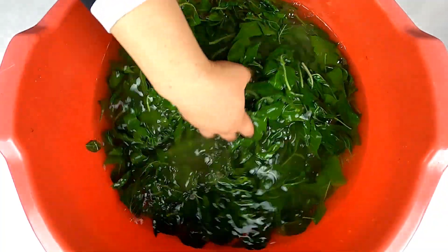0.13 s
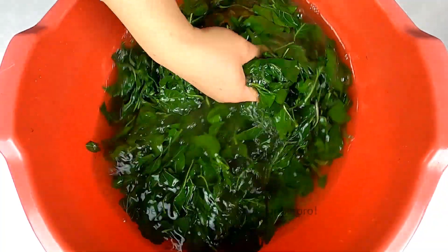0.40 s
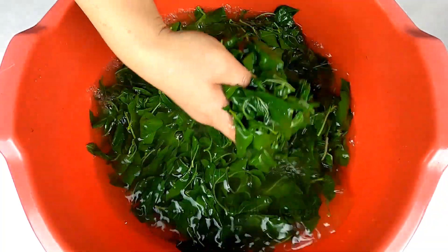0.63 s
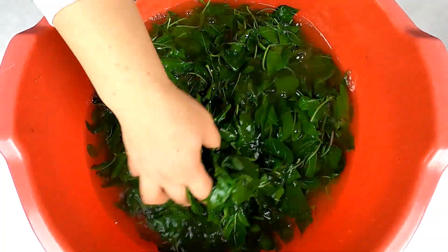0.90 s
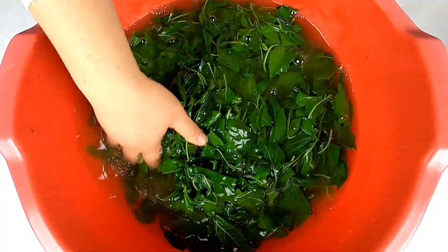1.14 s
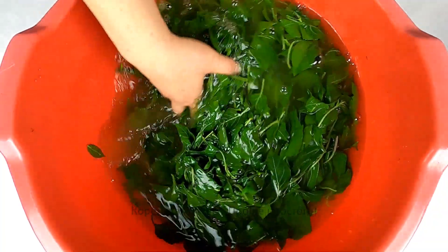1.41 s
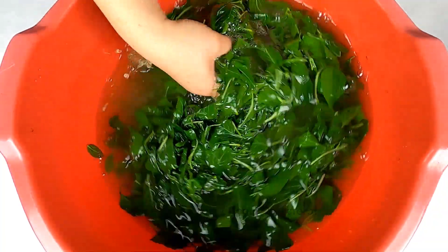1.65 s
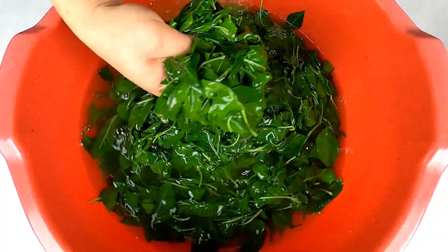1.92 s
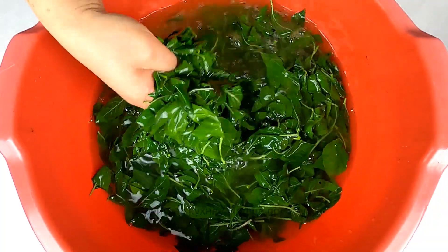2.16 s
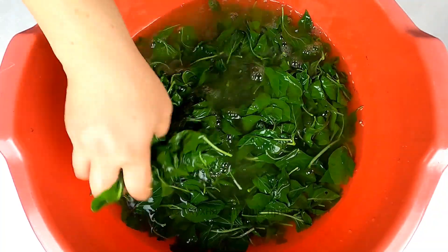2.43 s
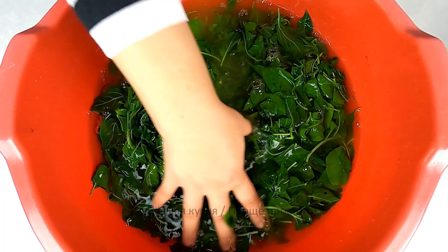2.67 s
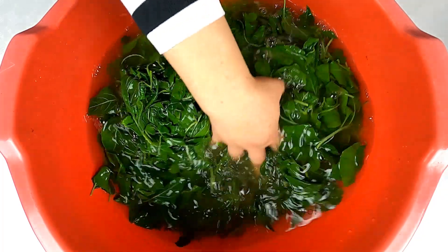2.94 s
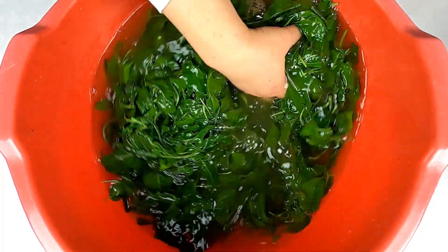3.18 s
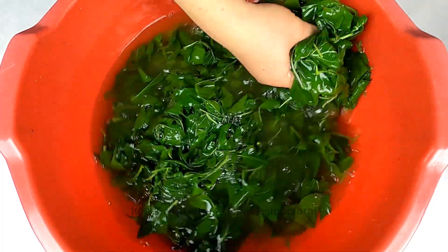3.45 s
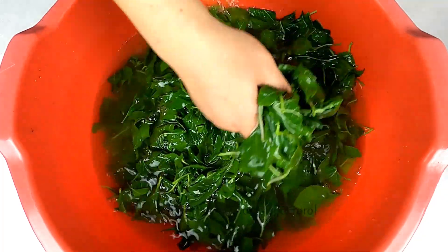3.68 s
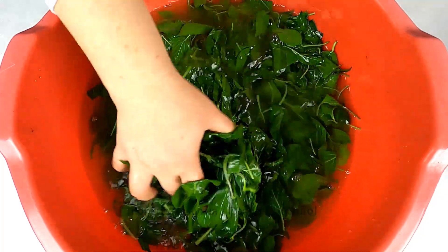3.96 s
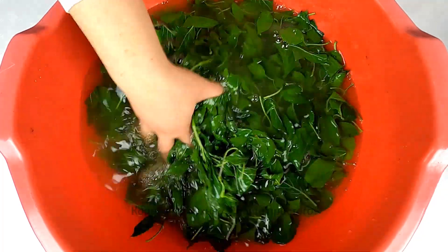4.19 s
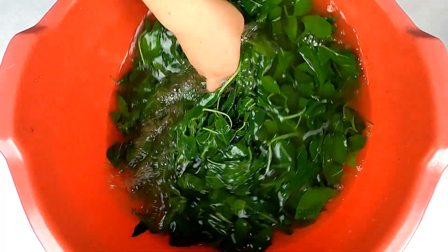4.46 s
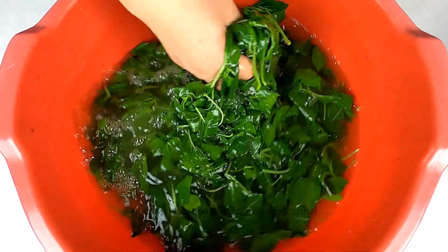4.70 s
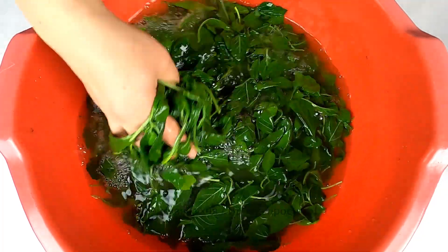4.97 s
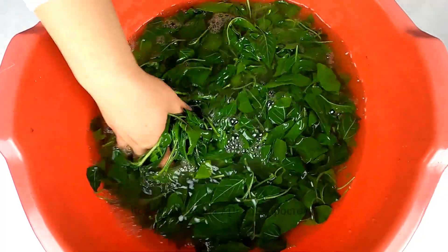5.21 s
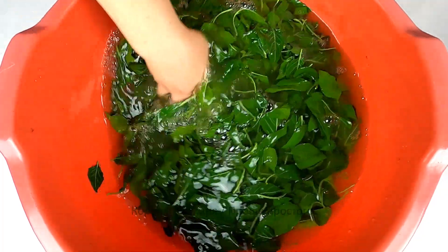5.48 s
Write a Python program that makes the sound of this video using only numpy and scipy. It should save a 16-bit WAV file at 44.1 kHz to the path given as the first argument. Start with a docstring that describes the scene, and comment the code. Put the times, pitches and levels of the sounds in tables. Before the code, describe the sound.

Close, bright water sounds: bubbly swishing and trickling surge and fade as leaves are stirred in a basin, with sharp plops and tiny snaps.

```python
"""Trapped air rings as gliding bubbles while a hand stirs wet leaves in a plastic basin of water.
Single bubbles and dense swarms are decaying sines; splashes, snapping films and thuds are shaped
noise bursts. A stereo microphone hears them close by in a quiet kitchen, with a short sparse echo tail
and steady noise as background."""
import sys
import numpy as np
from scipy import signal
from scipy.fft import rfft, irfft, next_fast_len
from scipy.io import wavfile
from scipy.ndimage import uniform_filter1d

SR = 44100
rng = np.random.default_rng(int(sys.argv[2]) if len(sys.argv) > 2 else 0)


def makeup_ratio(level_db):
    """Linear amplitude ratio for a level in decibels (20 dB per factor of ten)."""
    decades = np.asarray(level_db, float) / 20
    return 10 ** decades


def generate_wav(signal):
    """Clip the signal to [-1, 1] and save it as 16-bit WAV at the path in sys.argv[1]."""
    frames = np.transpose(np.atleast_2d(signal))
    scaled = np.clip(frames, -1, 1) * 32767
    pcm = np.round(scaled).astype(np.int16)
    wavfile.write(sys.argv[1], SR, pcm)


N = 246871  # samples

# The clearest bubbles. Each row: start in seconds, level in dB before flutter, start pitch in Hz,
# t60 in seconds, pitch rise over t60 as a share of the start pitch.
CLEAR_BUBBLES = [(0.0115, -30, 3430, 0.022, -.5), (0.076, -30.5, 1446, 0.056, 0.3),
                 (0.195, -33.5, 506, 0.019, 1.5), (0.2012, -28.5, 3770, 0.028, -1),
                 (0.2012, -24, 2120, 0.014, -0.5), (0.275, -36.5, 1430, 0.05, 0.2),
                 (0.326, -18.5, 2400, 0.021, 0.5), (0.333, -21, 3030, 0.009, 0.5),
                 (.434, -26, 4070, 0.015, 0.1), (.553, -34, 1990, 0.016, 0), (0.636, -36, 1370, 0.024, 0),
                 (0.6607, -28.5, 2650, 0.026, -0.1), (0.681, -27, 2340, 0.022, 0),
                 (0.696, -35, 1250, 0.015, 0), (.797, -30, 1220, 0.038, 1), (0.8236, -26, 1013, 0.042, 0.5),
                 (0.898, -18, 960, 0.0053, 2.5), (.959, -26.5, 788, 0.038, 1),
                 (.993, -21.5, 1520, 0.023, -0.5), (1.0994, -19, 1900, 0.0095, -0.7),
                 (1.1536, -13, 2530, 0.0046, 0), (1.232, -23, 2750, 0.017, 2),
                 (1.2346, -9, 6370, 0.0059, 1.23), (1.278, -46, 1133, 0.069, -0.5),
                 (1.322, -31, 4550, 0.019, -0.6), (1.338, -33, 3200, .015, .2),
                 (1.3456, -30, 4900, 0.016, 0.2), (1.526, -35, 2900, .016, 0), (1.537, -36, 1750, .05, -.1),
                 (1.553, -30, 3060, 0.02, -0.2), (1.584, -38, 1150, .03, .1),
                 (1.657, -27, 3060, 0.02, -0.3), (1.6793, -17, 3570, 0.0059, 0.7),
                 (1.6902, -4.5, 1340, 0.02, 0.1), (1.6912, -23, 490, 0.022, 0),
                 (1.7032, -27, 1280, 0.05, 0.2), (1.714, -24, 1400, .055, -.1),
                 (1.737, -34, 1366, 0.092, -0.05), (1.7955, -25, 2150, 0.022, -0.4),
                 (1.807, -29, 1750, .03, -.3), (1.822, -14, 1067, 0.016, -0.2),
                 (1.827, -24, 820, 0.035, -0.6), (1.841, -28, 1700, 0.06, 1.0),
                 (1.934, -27, 2800, 0.022, 0), (2.04, -19.5, 1410, 0.021, -0.26),
                 (2.051, -43, 1372, 0.16, 0.02), (2.073, -30.5, 2830, 0.046, 0.9),
                 (2.1707, -23, 2630, 0.014, 0.5), (2.189, -30.5, 1470, 0.024, 0),
                 (2.2245, -26, 2284, 0.026, 0), (2.314, -24, 1370, 0.024, 2.5),
                 (2.356, -23.5, 1790, 0.016, 0.5), (2.361, -24, 2620, 0.052, 0.4),
                 (2.393, -31, 484, 0.052, 0.8), (2.399, -19, 1500, 0.012, -0.5),
                 (2.4253, -35, 505, 0.067, 1), (2.439, -29, 1390, 0.025, -1),
                 (2.84, -4.5, 5190, 0.0066, -0.65), (2.859, -14.5, 944, 0.035, 0.5),
                 (2.876, -30.5, 1010, 0.037, 3), (2.889, -29, 2340, 0.019, 0), (2.909, -36, 960, 0.034, 0),
                 (2.917, -40, 1164, 0.076, 2), (2.918, -33, 2800, .02, 0.5),
                 (2.952, -20.5, 786, 0.068, 0.53), (2.953, -17, 3210, 0.015, -1),
                 (2.964, -26, 2400, .015, -1.5), (2.9814, -29, 2160, 0.035, 0.3),
                 (2.983, -35, 615, 0.0385, -1), (2.995, -26.5, 896, 0.056, 0), (3.008, -38.5, 590, 0.14, 2),
                 (3.023, -33, 704, 0.093, 2.1), (3.051, -34, 1340, 0.024, 1.5),
                 (3.0583, -25.5, 926, 0.018, 1.1), (3.086, -38, 920, 0.017, -0.5),
                 (3.088, -32, 1950, 0.019, -0.3), (3.287, -15.5, 1855, 0.015, 0),
                 (3.2902, -25.5, 2040, 0.03, 3), (3.293, -37, 1720, 0.05, -0.5),
                 (3.6546, -25.5, 772, 0.07, 1), (3.7187, -13, 2290, 0.0052, -0.5),
                 (3.7602, -24, 3840, 0.01, -0.5), (3.8032, -20.5, 1320, 0.0086, 0),
                 (3.8922, -24, 4450, 0.019, 1.5), (3.904, -20, 756, 0.018, 0.7),
                 (3.9212, -21, 3080, 0.019, 1.5), (4.051, -26.5, 2200, 0.037, 1.2),
                 (4.066, -21, 3150, .016, 0.05), (4.1297, -13.5, 2870, 0.0076, -0.3),
                 (4.1672, -6.5, 1190, 0.0062, 0.5), (4.175, -19.5, 2650, 0.014, 0.1),
                 (4.1785, -29, 5400, .015, 0), (4.18, -19, 1650, 0.018, 0.2), (4.19, -36, 396, .17, -0.06),
                 (4.198, -22, 2570, 0.017, 0.5), (4.2587, -23, 1150, 0.039, 0.05),
                 (4.2705, -16.5, 1000, 0.023, 0.4), (4.2722, -23.5, 1540, 0.026, 0.3),
                 (4.3084, -26, 1320, 0.026, 0.5), (4.366, -30.5, 540, 0.012, 4.5),
                 (4.4917, -23.5, 2676, 0.02, 0), (4.509, -35, 2940, 0.018, -0.5),
                 (4.5973, -29, 3350, 0.045, 0.1), (4.651, -22.5, 3000, 0.03, -.5),
                 (4.678, -39.5, 1285, 0.037, 0), (4.68, -32, 6730, 0.0095, -0.3),
                 (4.8454, -18, 2480, 0.011, 0.5), (4.8683, -26, 3200, 0.012, 0.8),
                 (5.0426, -28, 456, 0.043, 1.7), (5.0605, -11.5, 3810, 0.0085, -0.5),
                 (5.0665, -29.5, 863, 0.051, 0.5), (5.173, -24, 1580, 0.015, 0),
                 (5.212, -20, 1410, 0.0097, 0), (5.2217, -18, 560, 0.016, 1),
                 (5.253, -23.5, 520, 0.026, -0.5), (5.27, -17, 1360, 0.014, 0.5),
                 (5.2916, -24, 2920, 0.016, -0.5), (5.302, -27, 547, 0.027, 2),
                 (5.304, -14.5, 1900, 0.011, 0.5), (5.3056, -11, 4400, 0.0099, 0.9),
                 (5.333, -33, 484, 0.017, 1), (5.392, -26, 450, 0.017, 1), (5.4109, -27, 637, 0.024, 1),
                 (5.49, -19.5, 500, 0.029, -0.26), (5.583, -9, 1450, 0.0081, 1)]
BUBBLE_RISE_CYCLES, SWARM_RISE_CYCLES = 1.1, 3.5  # time constant of the onset, in cycles
FADE_BEND = 1.12  # above 1 a bubble holds a moment, then dies quickly
FLUTTER_DB, PATTER_DB = 3.6, 2.3  # rms flutter of the clear bubbles, rms quick bunching of the stirring

# Bubble swarms, large, middle and fine. Each row: lowest pitch in Hz, highest pitch in Hz, bubbles per
# second, mean cycles to t60, size spread in dB, share of smooth wash at middling stirring.
SWARMS = [(350, 1000, 450, 16, 4.3, .45), (1050, 4000, 1800, 22, 4.7, .28),
          (4000, 10500, 1200, 34, 4.7, .28)]
# Strength of stirring before bunching. Each row: time in seconds, level of the middle swarm in dB,
# large swarm above the middle one in dB.
STIRRING = [(0, -35, -13.5), (.04, -39.5, -5.5), (.12, -55.5, 0), (.3, -49, -10.5), (.52, -59.5, -6),
            (.65, -49.5, -37), (.8, -49.5, -19), (1.0, -38, -12.5), (1.17, -42.5, -21), (1.3, -51.5, -16),
            (1.4, -49, -7.5), (1.62, -56, -26), (1.7, -42, -4.5), (1.765, -47.5, -5), (1.84, -39.5, -21),
            (1.93, -46, -13), (2.0, -55, -21), (2.15, -50, -29), (2.32, -40, -9), (2.55, -44, -13.5),
            (2.78, -51, -13), (2.9, -39.5, -9), (3.1, -55, -10), (3.4, -55.5, -23), (3.56, -53.5, -9.5),
            (3.68, -41, -8), (3.82, -44, -23), (3.91, -38.5, -9), (3.98, -47.5, -11), (4.06, -35.5, -7),
            (4.12, -39.5, -23), (4.15, -36, -16), (4.19, -33.5, -7.5), (4.24, -40.5, -24),
            (4.33, -50, -8.5), (4.38, -51, 2.5), (4.44, -50, -1.5), (4.5, -50, -10), (4.65, -48.5, -8.5),
            (4.8, -46.5, -17.5), (4.92, -48.5, -20), (5.09, -39.5, -8), (5.19, -43, -15),
            (5.3, -34.5, -10.5), (5.35, -42, -10.5), (5.48, -47.5, -13), (5.6, -53.5, 0)]
# Fine spray follows the stirring only in part: dB under the middle swarm when that is at
# STIR_MID_DB, and dB gained per dB of stirring.
SPRAY_DB, STIR_MID_DB, SPRAY_SLOPE = -13, -41.5, 0.66
# Slow thinning and thickening of the spray around that rule. Each row: time in seconds, change in dB.
TREBLE_DRIFT = [(0, -6), (.4, 4), (1.0, -3), (1.35, 0.5), (1.64, 1.5), (1.74, 0.5), (1.82, 2), (2.5, 0.5),
                (2.9, 0), (3.4, -1.5), (3.55, 11), (3.75, -1), (4.2, 1), (4.4, -10), (4.6, 4), (5.1, -1),
                (5.4, 3.5)]
# Spectrum weighting of the tiny film snaps. Each row: frequency in Hz, gain in dB.
SNAP_SPECTRUM = [(800, -38), (2000, 1), (4000, -4.5), (7000, -5.5), (10000, -30), (13000, -19.5),
                 (16000, -32)]
SNAPS_PER_S, SNAPS_DB = 280, 4.5  # rate; level over the fine swarm

# Splashes and snapping films. Each row: start in seconds, level in dB, centre frequency in Hz.
SPLASHES = [(0.0327, -20, 5600), (0.307, -23, 2710), (0.4148, -22, 4080), (0.716, -32, 2680),
            (0.7832, -27, 2840), (0.823, -18.5, 3920), (.85, -22.5, 3300), (1.2322, -4, 8140),
            (1.678, -12.5, 3600), (1.6895, -9.5, 3640), (1.7932, -19, 2820), (1.8948, -20, 4070),
            (1.95, -25.5, 4800), (2.037, -27.5, 2680), (2.818, -26, 5130), (2.8395, -10, 3820),
            (2.861, -15.5, 7050), (2.8912, -24, 3200), (2.993, -20.5, 2510), (3.0837, -29, 3620),
            (3.2862, -30, 2680), (3.608, -20, 4770), (4.142, -25, 2200), (4.153, -19, 3000),
            (4.167, -11, 3520), (4.172, -15, 4950), (4.181, -21, 3000), (4.192, -21, 2410),
            (4.228, -30, 2500), (5.113, -25, 2260), (5.2979, -9, 4800), (5.3901, -21.5, 2830)]
SPLASH_CYCLES, SPLASH_RISE_S = 75.5, 0.0037  # cycles of the centre frequency to t60; onset constant
# Water slopping against the basin wall. Each row: start in seconds, level in dB, centre frequency
# in Hz, t60 in seconds.
THUDS = [(.002, -31.5, 230, 0.22), (0.13, -52, 100, 0.24), (.257, -52, 27.8, 0.28), (1.68, -32, 53, 0.15),
         (1.814, -29, 305, 0.14), (2.858, -42, 99, 0.17), (3.08, -39.5, 180, 0.14),
         (3.167, -40, 36.3, 0.24), (4.426, -41, 188, 0.37), (4.171, -42, 400, 0.14), (5.3, -53, 31, 0.58),
         (5.36, -46.5, 260, 0.66), (5.383, -43, 100, 0.2)]
# Single sharp film snaps. Each row: start in seconds, level in dB, centre frequency in Hz.
TICKS = [(0.784, -26, 6740), (1.104, -26, 7000), (1.2336, -11, 6970), (2.506, -26, 7640),
         (2.816, -23, 5070), (2.84, -16, 4620), (2.8923, -29, 4360), (2.97, -22.5, 5100),
         (3.059, -24, 5670), (3.1684, -35, 5050), (3.237, -29.5, 4260), (3.287, -28, 4310),
         (4.134, -34, 4190), (4.602, -21, 4900), (4.72, -31, 4410), (4.824, -33, 4730), (5.2844, -22, 4610)]
TICK_T60, TICK_APART = 0.0027, 1  # seconds; noise of each port alone, relative to the shared noise

# Where the hand is. Each row: time in seconds, left over right in dB.
HAND_PAN = [(0, 1), (.64, -1.5), (1.67, 0.5), (2.5, 0), (3.32, -1.5), (3.9, -1.5), (4.08, -0.5), (4.6, 0.5),
            (4.83, -1.5), (5.07, 0.5), (5.6, -1)]
# Phase lag of the left port behind the right. Each row: frequency in Hz, lag in radians.
PORT_LAG = [(200, .09), (700, .12), (2300, .6), (8000, .95), (14000, 1.4)]
KITCHEN_T60, KITCHEN_DB = 0.1, -11  # seconds; total level of the tail under the direct sound
# Spectrum of the kitchen hush. Each row: frequency in Hz, relative level in dB per Hz.
HUSH_SPECTRUM = [(20, -4.5), (60, -13), (120, -11), (150, 0.5), (200, 4.5), (300, -8), (800, -11),
                 (1400, -48), (3000, -41), (8000, -20), (14000, -45), (16400, -51)]
HUSH_DB = -62.5  # rms
EDGE_HZ = 16300  # upper band limit

LEFT_RIGHT = np.array([[1], [-1]])


def evened(x):
    """Normalization: scales a signal to an rms of 1."""
    return x / np.sqrt(np.mean(x ** 2) + 1e-20)


def add(mix, s, sound):
    """Superposition: sums a sound into the mix at time s."""
    part = mix[round(s * SR):][:len(sound)]
    part += sound[:len(part)]


def coloured(x, points):
    """Linear filtering: weights the spectrum by (Hz, dB) points joined on a logarithmic axis."""
    size = next_fast_len(x.shape[-1])
    f, db = np.transpose(points)
    hz = np.fft.rfftfreq(size, 1 / SR)
    gain = makeup_ratio(np.interp(np.log(hz + 1), np.log(f + 1), db))
    return irfft(rfft(x, size) * gain, size)[..., :x.shape[-1]]


def along(table, column):
    """Linear interpolation: one column of a time table at every sample."""
    rows = np.array(table)
    return np.interp(np.arange(N) / SR, rows[:, 0], rows[:, column])


def clicks(per_s, spread_db):
    """Random impulse train: exponential sizes in dB, most small and a few large."""
    hits = rng.random(N) < per_s / SR
    sizes = np.minimum(rng.exponential(1, N), 3.7)
    return hits * makeup_ratio(spread_db * sizes)


def clumps(depth_db, size=900):
    """Random modulation: water breaks in bunches, from noise smoothed twice over size samples."""
    noise = rng.standard_normal(N)
    smooth = uniform_filter1d(uniform_filter1d(noise, size), size)
    return makeup_ratio(depth_db * evened(smooth))


def bubble(hz, t60, rise, start):
    """Damped resonance: a pocket of air rings and dies, its pitch sliding as it nears the surface."""
    t = np.arange(int(t60 * SR)) / SR
    turns = hz * (t + rise * t * t / t60 / 2)
    fade = makeup_ratio(-60 * (t / t60) ** FADE_BEND)
    return (1 - np.exp(-t / start)) * fade * np.sin(2 * np.pi * turns)


def clear_bubbles():
    """Resonance under modulation: single bubbles flutter as the surface shakes them."""
    out = np.zeros(N)
    for s, db, hz, t60, rise in CLEAR_BUBBLES:
        add(out, s, makeup_ratio(db) * bubble(hz, t60, rise, start=BUBBLE_RISE_CYCLES / hz))
    return out * clumps(FLUTTER_DB, size=150)


def swarm(lo_hz, hi_hz, per_s, cycles, spread_db, wash):
    """Superposed resonances: 24 kinds of bubble, scattered left and right, over a smooth wash."""
    out = np.zeros((2, N))
    for k, (jitter, life, rise, side) in enumerate(rng.random((24, 4))):
        hz = lo_hz * (hi_hz / lo_hz) ** ((k + jitter) / 24)
        t60 = cycles * (.4 + 1.2 * life) / hz
        ring = bubble(hz, t60, 1.1 * rise - .3, start=SWARM_RISE_CYCLES / hz)
        ring = evened(ring) / np.sqrt(len(ring))  # equal energy
        sound = signal.oaconvolve(clicks(per_s / 24, spread_db), ring)[:N]
        side_db = 15.0 * (hz / 4000) ** 0.62 * (side - .5) * LEFT_RIGHT
        fine_db = -.5 * k * (lo_hz > 3000)  # in the fine swarm, the finest are faintest
        out += sound * makeup_ratio(side_db + fine_db)
    band = [(lo_hz / 5, -70), (lo_hz / 2, -25), (lo_hz, 0), (hi_hz, -3 - hi_hz / 700), (hi_hz * 2, -45)]
    # harder stirring blends the bubbles into a rush
    merging = wash * makeup_ratio(.6 * (along(STIRRING, column=1) - STIR_MID_DB))
    noise = rng.standard_normal(N) + hi_hz / 30000 * rng.standard_normal((2, N))
    return evened(evened(out) + merging * evened(coloured(noise, band)))


def snaps():
    """Impulsive radiation: tiny films burst as puffs of a few milliseconds, in 24 colours and places."""
    t, out = np.arange(512) / SR, np.zeros((2, N))
    for noise, (pitch, life, side) in zip(rng.standard_normal((24, 3, 512)), rng.random((24, 3))):
        hz = 2500 * 5.5 ** pitch
        mixed = noise[0] + (0.1 + 1.8 * pitch ** 3) * noise[1:]  # brighter puffs differ more by port
        puff = evened(coloured(mixed, [(hz / 3, -20), (hz, 0), (hz * 3.1, -12)]))
        fade_db = -60 * t / (.003 + .006 * life)
        side_db = 5.0 * (side - .5) * LEFT_RIGHT
        puff = puff * (1 - np.exp(-t / .002)) * makeup_ratio(fade_db + side_db)
        out += signal.oaconvolve(clicks(SNAPS_PER_S / 24, 4.2)[None], puff, axes=1)[:, :N]
    return evened(coloured(out, SNAP_SPECTRUM))


def stirring():
    """Amplitude modulation: the three swarms and the film snaps follow the hand."""
    large, middle, fine = (swarm(*row) for row in SWARMS)
    spray = clumps(2.2) * (fine + makeup_ratio(SNAPS_DB) * snaps())
    level_db = along(STIRRING, column=1)
    spray_db = STIR_MID_DB + SPRAY_DB + SPRAY_SLOPE * (level_db - STIR_MID_DB)
    spray_db = spray_db + along(TREBLE_DRIFT, column=1)
    bubbles = makeup_ratio(level_db) * (makeup_ratio(along(STIRRING, column=2)) * large + middle)
    return clumps(2.18) * clumps(PATTER_DB, size=200) * (bubbles + makeup_ratio(spray_db) * spray)


def splashes():
    """Damped noise: bursts of spray in which the brightest die fastest."""
    t, out = np.arange(8192) / SR, np.zeros(N)
    for s, db, hz in SPLASHES:
        noise = rng.standard_normal(8192)
        ragged = makeup_ratio(3.0 * evened(uniform_filter1d(noise[::-1], 60)))  # droplets land unevenly
        spray = evened(coloured(noise, [(150, -60), (700, -22), (hz / 2, -6), (hz, 0),
                                        (min(hz * 2.07, 11000), -17), (16500, -40)]))
        fade = makeup_ratio(db - 60 * t * hz / SPLASH_CYCLES)
        add(out, s, fade * (1 - np.exp(-t / SPLASH_RISE_S)) * ragged * spray)
    return out


def thuds():
    """Damped low-frequency noise: water slops against the basin wall with a soft onset."""
    t, out = np.arange(16384) / SR, np.zeros(N)
    for s, db, hz, t60 in THUDS:
        noise = rng.standard_normal(16384)
        slop = evened(coloured(noise, [(hz / 4, -35), (hz, 0), (hz * 1.76, -12), (hz * 4, -40)]))
        add(out, s, makeup_ratio(db - 60 * t / t60) * (1 - np.exp(-t / 0.016)) ** 2 * slop)
    return out


def ticks():
    """Impulsive radiation: single film snaps are bright noise puffs of a few milliseconds."""
    t, out = np.arange(1024) / SR, np.zeros((N, 2))
    for s, db, hz in TICKS:
        noise = rng.standard_normal((3, 1024))
        mixed = noise[0] + TICK_APART * noise[1:]
        puff = evened(coloured(mixed, [(1500, -30), (hz / 1.5, -5), (hz, 0), (11000, -12), (16500, -30)]))
        envelope = (1 - np.exp(-t / 0.00021)) * makeup_ratio(db - 60 * t / TICK_T60)
        add(out, s, (puff * envelope).T)
    return out.T


def placed(water):
    """Stereo level and phase differences: level follows the hand, and the left port lags."""
    water = water * makeup_ratio(along(HAND_PAN, column=1) * .5 * LEFT_RIGHT)
    size, (f, lag) = next_fast_len(N), np.transpose(PORT_LAG)
    hz = np.fft.rfftfreq(size, 1 / SR)
    turn = np.exp(-1j * np.interp(np.log(hz + 1), np.log(f), lag))
    water[0] = irfft(rfft(water[0], size) * turn, size)[:N]
    return water


def surroundings(x):
    """Reverberation: sparse dull echoes from basin and kitchen, different at each port."""
    t = np.arange(SR // 4) / SR
    echoes = rng.standard_normal((2, len(t))) * (rng.random((2, len(t))) < .1)
    tail = echoes * makeup_ratio(-60 * t / KITCHEN_T60) * (t > .002)
    tail = coloured(tail, [(150, -20), (600, -6), (2000, -9.5), (12000, -12.0)])
    tail *= makeup_ratio(KITCHEN_DB) / np.linalg.norm(tail, axis=1, keepdims=True)
    return x + signal.oaconvolve(x, tail, axes=1)[:, :N]


def hush():
    """Stationary noise: air and appliances of the kitchen, partly shared by both ports."""
    noise = rng.standard_normal(N) + 1.96 * rng.standard_normal((2, N))
    return makeup_ratio(HUSH_DB) * evened(coloured(noise, HUSH_SPECTRUM))


def scene():
    """Superposition: the water sounds at the hand, their echoes and the kitchen hush."""
    water = stirring()
    # bubbles and splashes are thin in the bass, 20 dB down below 100 Hz
    water = water + coloured(clear_bubbles() + splashes(), [(100, -20), (350, 0)])
    water = water + thuds() + ticks()
    return surroundings(placed(water)) + hush()


def top_cut(x):
    """Nothing passes above the cut-off."""
    return signal.sosfilt(signal.butter(12, 16520, fs=SR, output="sos"), x)


def record(dry):
    """Band limitation: a linear-phase low-pass removes the highest treble."""
    low_pass = signal.firwin(255, EDGE_HZ, fs=SR)
    mix = signal.oaconvolve(dry, low_pass[None], "same")
    return top_cut(mix)


dry = scene()
out = record(dry)
generate_wav(out)
```